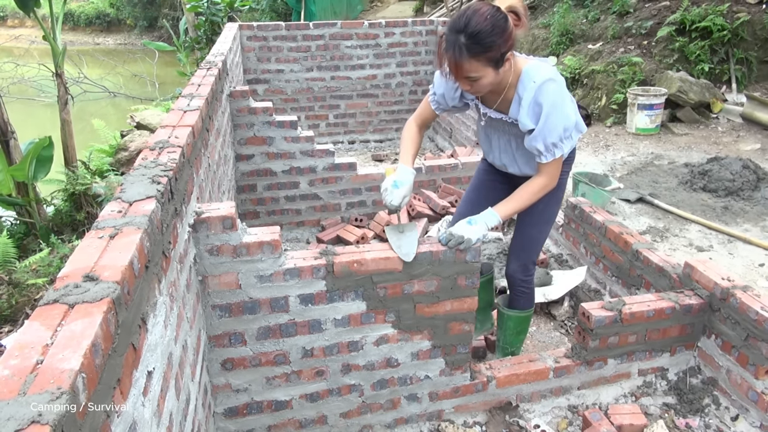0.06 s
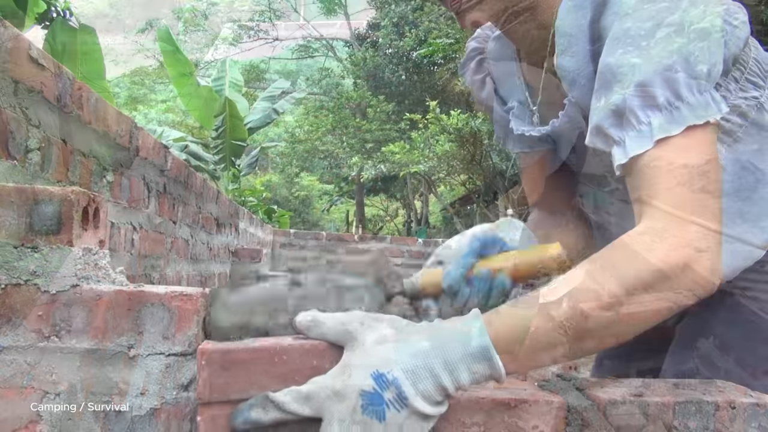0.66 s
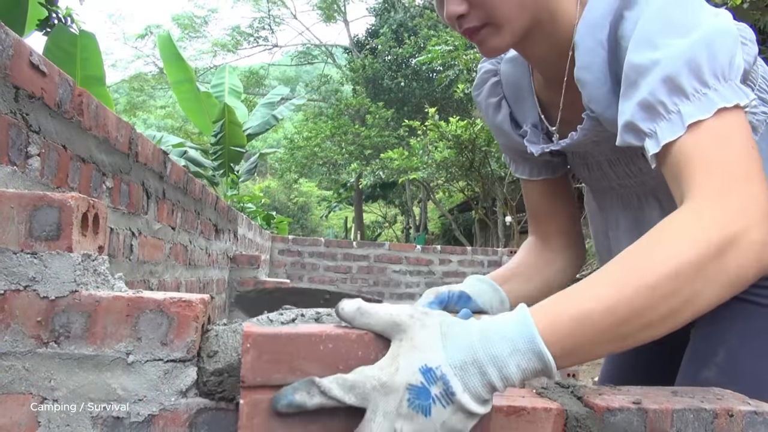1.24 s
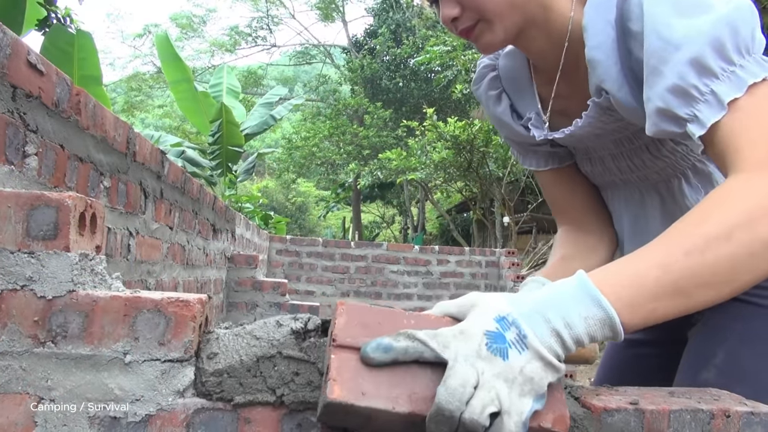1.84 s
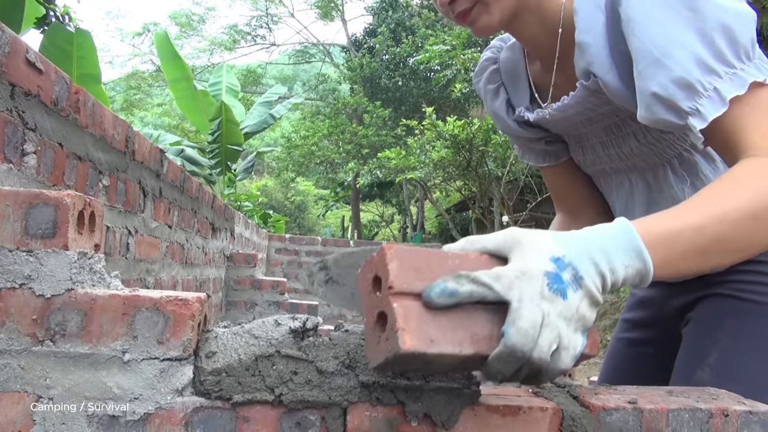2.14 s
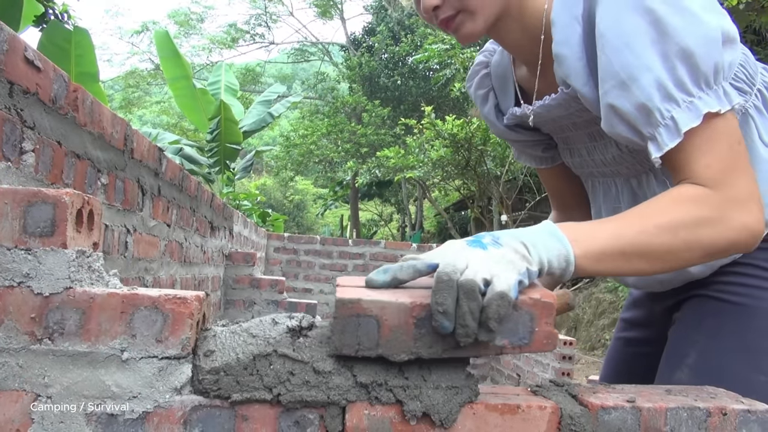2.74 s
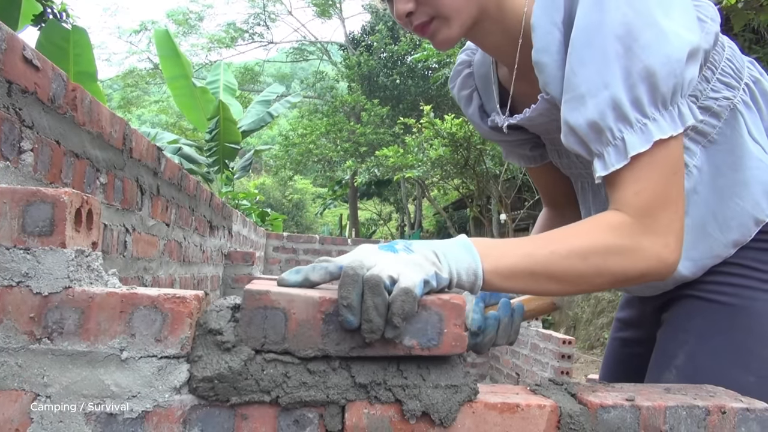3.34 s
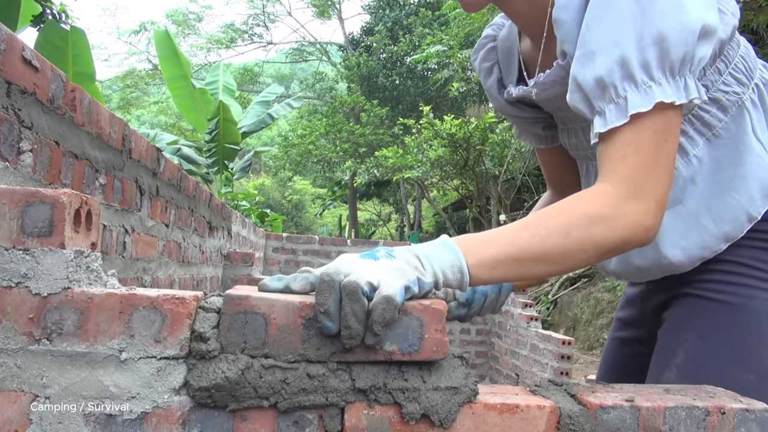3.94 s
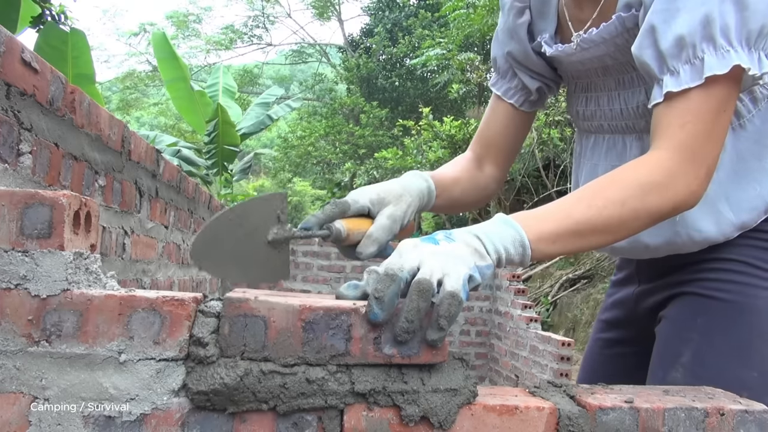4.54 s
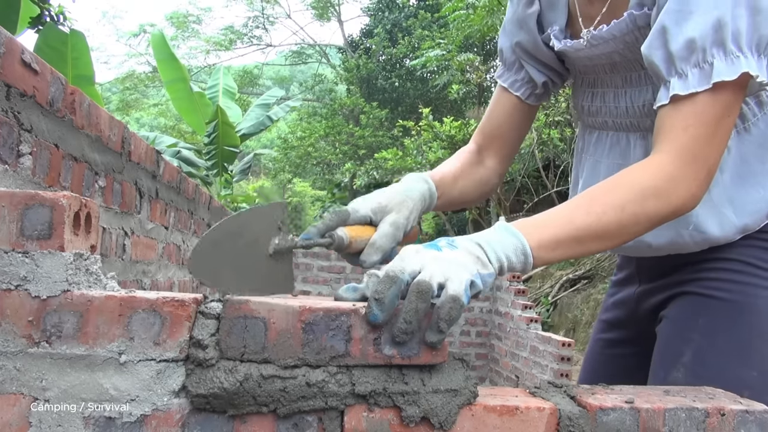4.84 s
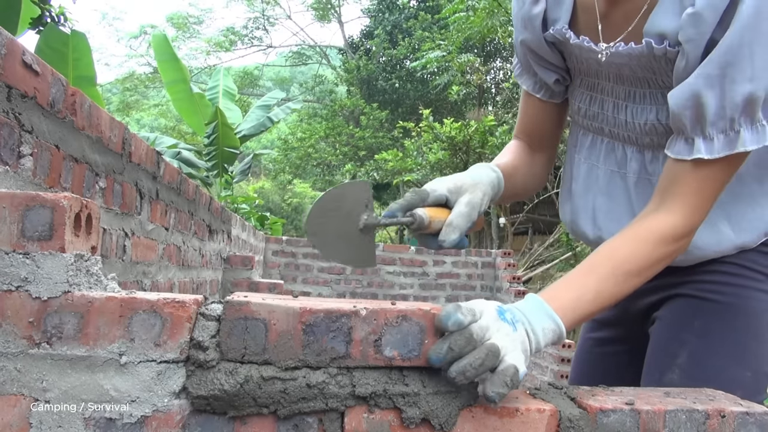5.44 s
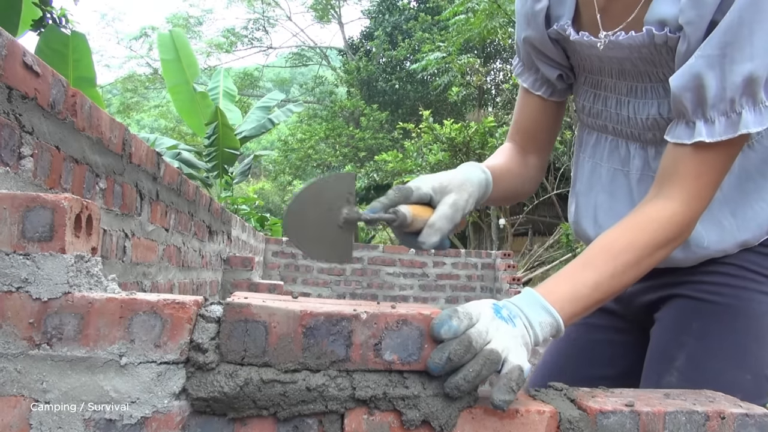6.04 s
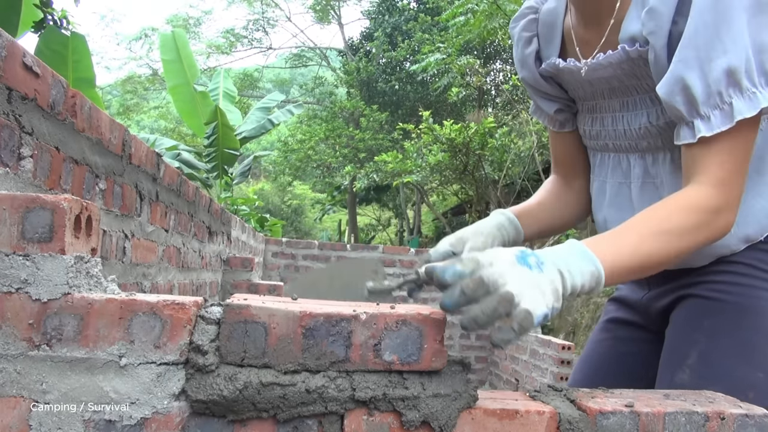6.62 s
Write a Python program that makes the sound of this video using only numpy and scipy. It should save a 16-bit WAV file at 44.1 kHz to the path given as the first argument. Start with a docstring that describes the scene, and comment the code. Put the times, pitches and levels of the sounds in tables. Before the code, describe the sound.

Close to a bricklayer outdoors, gritty trowel scrapes mix with light taps, glove rubs and the soft thumps of a brick. A quieter stretch follows, with wet mortar hissing and crackling under pressure. In the second half the steel trowel strikes the brick six times, in two uneven groups of three, cracking, thudding and ringing briefly. Gentle air, a thin insect drone and occasional far bird chirps sit behind.

```python
"""Outdoors between low brick walls, close to a bricklayer at work.
A steel trowel scrapes over sand and its blade sings; a brick bumps into its bed, squeezing out
crackling mortar. Two light taps come early, six hard ones later knock the brick level: each
cracks, clacks, thuds in the wall and rings the blade. Soft air, insects and a few far birds behind."""
import sys
import numpy as np
from scipy import signal
from scipy.fft import rfft, irfft
from scipy.io import wavfile
from scipy.ndimage import map_coordinates

SR = 44100
rng = np.random.default_rng(int(sys.argv[2]) if len(sys.argv) > 2 else 0)


def unload_audio(sound):
    """Save the sound as a 16-bit wav file, at the path given as the first command line argument."""
    columns = np.transpose(np.atleast_2d(sound))
    # keep every value between -1 and 1, then stretch to whole-number steps
    steps = np.round(np.clip(columns, -1, 1) * 32767)
    wavfile.write(sys.argv[1], SR, steps.astype(np.int16))


N = 294588
TIME_S = np.arange(N) / SR


def from_db(db):
    return 10 ** (np.asarray(db) / 20)


def unit_rms(x):
    return x / np.sqrt(np.mean(x ** 2) + 1e-20)


def at_hz(table, hz):
    """Interpolate on a log-frequency axis."""
    table_hz, values = np.transpose(table)
    return np.interp(np.log(np.maximum(hz, 1)), np.log(table_hz), values)


def add(out, start_s, sound):
    start = round(start_s * SR)
    out[..., start:start + sound.shape[-1]] += sound[..., :N - start]


def coloured(x, spectrum):
    """Apply a spectrum; rms 1."""
    n = x.shape[-1]
    gain = from_db(at_hz(spectrum, np.fft.rfftfreq(n, 1 / SR)))
    return unit_rms(irfft(rfft(x) * gain, n))


def band(x, low_hz, high_hz):
    return signal.sosfilt(signal.butter(2, [low_hz, high_hz], "band", fs=SR, output="sos"), x)


def resonator(x, hz, t60_s):
    """One mode; a unit click rings a sine of height 1."""
    r, w = from_db(-60 / (t60_s * SR)), 2 * np.pi * hz / SR
    return signal.lfilter([0, np.sin(w)], [1, -2 * r * np.cos(w), r * r], x + 1e-18)


def swell(peak_s, rise_s, fall_s):
    """Pressure grows and decays exponentially about a peak."""
    distance = np.maximum((peak_s - TIME_S) / rise_s, (TIME_S - peak_s) / fall_s)
    return np.exp(-np.minimum(distance, 20))


def push(start_s, length_s, attack_share=0.13, release_s=0.032):
    """Pressure ramps up, holds and dies away."""
    attack = np.clip((TIME_S - start_s) / (attack_share * length_s), 0, 1)
    return attack * np.exp(-np.clip((TIME_S - start_s - length_s) / release_s, 0, 20))


def grit(n, grains_per_s, spread_db, rub_db):
    """Two streams of uneven sand grains cracking over a smooth rub."""
    hits = rng.random((2, n)) < grains_per_s / SR
    sizes_db = spread_db * np.minimum(rng.exponential(1, hits.sum()), 4)
    grains = np.zeros((2, n))
    grains[hits] = from_db(sizes_db) * rng.choice([-1, 1], hits.sum())
    return unit_rms(grains) + from_db(rub_db) * rng.standard_normal((2, n))


def shifting_contact(x, depth_db, changes_per_s):
    """The contact patch keeps changing: each fifth of an octave comes and goes by itself."""
    hz, frame_s, frames = signal.stft(x, SR, nperseg=512)
    octaves = np.log2(np.maximum(hz, 500) / 500)
    grid = np.meshgrid(5 * octaves, frame_s * changes_per_s, indexing="ij")
    wander = map_coordinates(rng.standard_normal((30, 400)), grid, order=1, mode="mirror")
    _, varied = signal.istft(frames * from_db(depth_db * wander), SR)
    return unit_rms(varied[:, :N])


# Sound arriving from the sides: f/Hz, relative side gain/dB
SIDE_SPECTRUM = [(60, -13), (170, -24), (300, -16), (520, -12.5), (850, -0.5), (1400, -14), (2300, -34),
                 (4500, -14), (9000, -3.5), (15000, -21)]

def stereo(pair, side_db):
    """Left and right from a mid and a side signal."""
    mid, side = pair
    gain = from_db(side_db + at_hz(SIDE_SPECTRUM, np.fft.rfftfreq(len(mid), 1 / SR)))
    return mid + irfft(rfft(side) * gain, len(mid)) * [[1], [-1]]


# Air spectrum: f/Hz, relative level/dB
AIR_SPECTRUM = [(15, -49), (25, -50), (53, -7), (92, -7), (120, -8.5), (256, -4.5), (309, -7), (384, -3.5),
                (489, -5.5), (775, -5.5), (863, -6), (2550, -15.5), (3250, -16.5), (3720, -14),
                (16000, -26.5)]
# Left-right likeness of the air: f/Hz, coherence/1
AIR_COHERENCE = [(30, 0.43), (120, 0.42), (300, 0.49), (600, 0.03), (1500, 0.86), (4000, 1), (14000, .7)]
# Level of the air over time: t/s, gain/dB; a little louder for the first 0.7 s, then slowly sinking
AIR_LEVEL = [(.45, 2), (.7, 2), (4.5, 0.5), (5.3, -1.25)]

def open_air(level_db=-53.5):
    """Soft, wide noise, slowly sinking in level."""
    mid, side = rfft(rng.standard_normal((2, N)))
    coherence = at_hz(AIR_COHERENCE, np.fft.rfftfreq(N, 1 / SR))
    noise = irfft(np.sqrt(1 + coherence) * mid + np.sqrt(1 - coherence) * side * [[1], [-1]], N)
    drift_db = np.interp(TIME_S, *np.transpose(AIR_LEVEL))
    return from_db(level_db + drift_db) * coloured(noise, AIR_SPECTRUM)


def insects(centre_hz=4950, half_width_hz=170, level_db=-68):
    """A thin, steady chorus merged into one narrow band."""
    chorus = band(rng.standard_normal((2, N)), centre_hz - half_width_hz, centre_hz + half_width_hz)
    return from_db(level_db) * unit_rms(chorus)


# Glove rubs and mortar slumps: t/s, length/s, level/dB, centre f/Hz
RUBS = [(0.184, .17, -48, 292), (.37, 0.045, -41.5, 296), (0.544, .012, -40.5, 444), (0.711, .11, -34, 194),
        (1.184, 0.081, -40, 203), (1.291, 0.11, -44, 260), (1.395, 0.075, -43, 135),
        (1.548, 0.26, -53.5, 150), (2.058, 0.047, -46, 138), (6.475, 0.05, -44.5, 140),
        (6.524, 0.062, -36, 278)]

def soft_rubs(edge_ratio=1.56, scuff_db=-16):
    """Rubbing and falling crumbs shake low, heavily damped modes, with a little scuff above."""
    out = np.zeros((2, N))
    shake = grit(N, grains_per_s=300, spread_db=2.0, rub_db=-5.5)
    scuff = from_db(scuff_db) * unit_rms(band(rng.standard_normal((2, N)), 420, 1020))
    for start_s, length_s, db, hz in RUBS:
        near = slice(max(int((start_s - .2) * SR), 0), int((start_s + .7) * SR))
        body = unit_rms(band(shake[:, near], hz / edge_ratio, hz * edge_ratio))
        out[:, near] += from_db(db) * (body + scuff[:, near]) * push(start_s, length_s)[near]
    return stereo(out, side_db=1.0)


# Edge catches on sand and skids to rest: peak t/s, relative level/dB, fall/s
EDGE_CATCHES = [(.2, -33.5, 0.05), (0.2532, -30, 0.019), (.290, -32, 0.014), (0.8023, -20, 0.014),
                (1.01, -25, 0.0038), (1.4886, -20, 0.0035), (1.566, -35.5, .016), (2.059, -33.5, .012),
                (2.501, -45, .004), (3.718, -39.5, 0.0036), (3.733, -37.5, .006), (5.09, -46, 0.0087)]
# Blade drawn over brick: peak t/s, relative level/dB, rise/s
BLADE_STROKES = [(.32, -40, 0.056), (0.78, -32, 0.021), (1.0, -27, 0.0054), (1.68, -42.5, 0.058),
                 (2.087, -18, 0.011), (3.23, -48, .015), (3.305, -50, .009), (4.207, -37, 0.012),
                 (4.358, -47, 0.0064), (5.05, -40.5, .04), (6.61, -54, 0.21)]
# Rasp of steel on sand: f/Hz, relative level/dB
RASP_SPECTRUM = [(350, -26), (600, -9), (950, -20.5), (1250, -2), (1750, 1), (2000, -2), (2540, 2.5),
                 (4000, 0.5), (6000, -2.5), (8500, -3.5), (11500, -9), (14000, -16), (16000, -45)]
# Trowel blade modes, also rung by the taps: f/Hz, relative level/dB, t60/s
BLADE_MODES = [(1308, -2, .27), (1355, -5, .18), (1408, 0, .14), (1982, -2, .17), (2056, -3, .24),
               (2270, -4, .13), (2351, -2, .16), (2490, -5, .19), (2992, 0, .17), (4100, -3.5, .13),
               (5012, -12, .13), (5400, -13, .2), (5640, -9, .18), (5990, -8, .15), (6290, -14, .16),
               (6720, -10, .15)]

def trowel_scrapes(rasp_db=1.0, blade_db=-51, catch_rise_s=0.00051):
    """Sand grains break under each stroke and stir the blade's modes."""
    force = sum(from_db(db) * swell(s, catch_rise_s, fall_s) for s, db, fall_s in EDGE_CATCHES)
    force += sum(from_db(db) * swell(s, rise_s, 0.98 * rise_s) for s, db, rise_s in BLADE_STROKES)
    grains = grit(N, grains_per_s=2500, spread_db=2.5, rub_db=-4.5)
    grains = shifting_contact(grains, depth_db=4.5, changes_per_s=18)
    rasp = force * stereo(coloured(grains, RASP_SPECTRUM), side_db=-4.0)
    blade = sum(from_db(db) * resonator(rasp[0], hz, t60_s) for hz, db, t60_s in BLADE_MODES)
    return from_db(rasp_db) * rasp + from_db(blade_db) * blade


# Blade tones as the edge drags free: peak t/s, level/dB, f/Hz, rise/s
BLADE_TONES = [(.204, -32, 1615, 0.0048), (.33, -42.5, 1410, 0.053), (.35, -49, 2010, 0.027),
               (.36, -47, 5400, 0.063), (0.751, -26, 2503, 0.014), (1.018, -33, 2020, .008),
               (1.08, -36, 2488, 0.016), (2.09, -28.5, 1730, 0.0095)]

def blade_singing(t60_s=0.091):
    """Friction keeps single modes of the free blade sounding."""
    out = np.zeros(N)
    for peak_s, db, hz, rise_s in BLADE_TONES:
        tone = unit_rms(resonator(rng.standard_normal(N), hz, t60_s))
        out += from_db(db) * swell(peak_s, rise_s, 0.98 * rise_s) * tone
    return out


# Brick and trowel on the soft bed: t/s, level/dB, f/Hz, t60/s
BED_KNOCKS = [(0.5435, -18.5, 387, .034), (.803, -19.5, 272, 0.091), (.82, -28, 131, 0.14),
              (1.008, -26.5, 300, 0.056), (1.243, -27.5, 647, 0.035), (1.389, -25, 171, 0.13),
              (1.493, -24.5, 246, 0.062), (1.94, -38.5, 558, 0.079), (6.55, -35, 110, 0.13),
              (6.595, -35.5, 120, .08)]

def bed_knocks(contact_s=0.0011):
    """A cushioned contact swings one low mode for a few cycles."""
    out, t = np.zeros(N), np.arange(SR // 4) / SR
    onset = 1 - np.exp(-t / contact_s)
    for start_s, db, hz, t60_s in BED_KNOCKS:
        add(out, start_s, onset * from_db(db - 60 * t / t60_s) * np.sin(2 * np.pi * hz * t))
    return out


# Pushes on the mortar: t/s, length/s, midway level/dB, growth/dB, fine hiss gain/dB
MORTAR_PUSHES = [(0.551, 0.34, -49, 3.5, -2), (0.922, .25, -43.5, -3, 0), (1.205, 0.34, -47, 2, 1.5),
                 (1.544, 0.52, -46, -5.5, -3.5), (2.211, 0.092, -51, 2.5, -11), (2.63, 0.97, -46, 4.5, -2),
                 (3.741, 0.04, -47, -1, -2), (3.888, .06, -57.5, -1, 2), (4.106, .11, -44, 3, 2),
                 (4.278, .095, -46.5, 2.5, -3)]
# Wet sand: f/Hz, relative level/dB
MORTAR_SPECTRUM = [(400, -13.5), (600, -16.5), (850, -16.5), (1300, -1), (1600, -3.5), (2400, 1),
                   (4000, -1.5), (6000, -3.5), (9000, -6.5), (12000, -11), (16000, -24)]

def mortar(hiss_above_hz=5500):
    """Wet sand crackles and hisses as it is spread or squeezed under the brick."""
    grains = grit(N, grains_per_s=1000, spread_db=3.5, rub_db=2.0)
    grains = shifting_contact(grains, depth_db=2.5, changes_per_s=12)
    sand = stereo(coloured(grains, MORTAR_SPECTRUM), side_db=-2.5)
    coarse = signal.sosfiltfilt(signal.butter(2, hiss_above_hz, fs=SR, output="sos"), sand)
    hiss = sand - coarse
    out = np.zeros((2, N))
    for start_s, length_s, db, growth_db, hiss_db in MORTAR_PUSHES:
        progress = np.clip((TIME_S - start_s) / length_s, 0, 1)
        pressure = from_db(db + growth_db * (progress - .5)) * push(start_s, length_s)
        out += pressure * (coarse + from_db(hiss_db) * hiss)
    return out


# Sand crushed by the edge: f/Hz, relative level/dB
CRACK_SPECTRUM = [(300, -12), (1200, 8.5), (3000, 6.5), (6000, 2), (9000, 3), (12000, -5), (16000, -24)]

def edge_crack(t, crush_s=0.0066, snap_s=0.0001, snap_db=12.5):
    """Steel meets fired clay: one pressure snap and a moment of crushed sand."""
    sand = stereo(coloured(rng.standard_normal((2, len(t))), CRACK_SPECTRUM), side_db=-6)
    snap = band(np.exp(-t / snap_s), 270, 7500)
    return sand * np.exp(-t / crush_s) - from_db(snap_db) * snap


# Crowded modes of brick and wall: f/Hz, relative level/dB
CLACK_SPECTRUM = [(300, -12.5), (800, -15), (1200, 4), (1700, -3), (2400, 2.5), (3300, -4.5), (4600, -16),
                  (6000, -9.5), (7500, -13), (9000, -21), (12000, -31), (16000, -39)]
# Their decay: f/Hz, t60/s
CLACK_DECAY = [(300, 0.21), (1200, 0.12), (2500, 0.11), (5000, 0.097), (12000, 0.14)]

def brick_clack(t, hold_s=0.015, tail_db=-25.5, tail_s=0.075):
    """Gritty modes, fed briefly by near reflections, die fast into a faint tail from the yard."""
    grains = grit(len(t), grains_per_s=2500, spread_db=3.0, rub_db=-1.5)
    noise = stereo(coloured(grains, CLACK_SPECTRUM), side_db=2.0)
    out = from_db(tail_db) * noise * np.exp(-t / tail_s)
    edges_hz = np.geomspace(250, 16000, 7)
    for low_hz, high_hz in zip(edges_hz, edges_hz[1:]):
        t60_s = at_hz(CLACK_DECAY, np.sqrt(low_hz * high_hz))
        out += band(noise, low_hz, high_hz) * from_db(-60 * np.maximum(t - hold_s, 0) / t60_s)
    return out


# Wall modes: f/Hz, relative level/dB, t60/s
WALL_MODES = [(76, -23, .25), (132, -7, .17), (190, -5, .08), (246, 0, .08), (295, -5, .13), (376, -2, .11),
              (450, -10, .11), (500, -9, .11), (578, -4, .13), (652, -10, .1), (712, -10, .1)]

def wall_thud(t):
    """Each blow shakes the wall's low modes a little differently."""
    modes = [from_db(db - 60 * t / t60_s) * np.sin(2 * np.pi * hz * t) for hz, db, t60_s in WALL_MODES]
    strengths = rng.choice([-1, 1], len(modes)) * from_db(rng.normal(0, 1.0, len(modes)))
    pressure = band(strengths @ np.array(modes), 101, 960)
    sideways = signal.hilbert(pressure).imag  # standing wave: air motion is a quarter cycle off
    fade = np.minimum(2 - 4 * t, 1)
    return stereo((pressure, sideways), side_db=2.5) * fade


def blade_ring(t, first_hz, second_hz, clack_db, spot_octaves=0.093, second_db=-4):
    """A light touch rings the modes that the striking spot favours; a hard blow wakes them all."""
    out, floor = 0, from_db(-5 + 0.41 * clack_db)
    for hz, db, t60_s in BLADE_MODES:
        octaves_off = np.log2(hz / np.array([first_hz, second_hz]))
        first, second = np.exp(-(octaves_off / spot_octaves) ** 2)
        drive = max(first, from_db(second_db) * second, floor)
        scatter_db = rng.normal(0, hz / 3500)  # high modes depend most on the exact spot
        ear_db = db + scatter_db + rng.normal(0, 1.6, (2, 1))
        gripped_hz = hz * (1 + .002 * rng.standard_normal())  # the hand detunes the blade
        ear_phase_rad = rng.normal(0, 0.15, (2, 1))
        tone = np.sin(2 * np.pi * gripped_hz * t + ear_phase_rad) * rng.choice([-1, 1])
        out += drive * from_db(ear_db - 60 * t / t60_s) * tone
    return out


def blade_overtones(t, count=36, t60_at_5khz_s=0.15, tilt_db_per_octave=-3.0):
    """Short high modes, new with each blow; the highest are weakest and die first."""
    hz = np.exp(rng.uniform(np.log(3500), np.log(13000), size=(count, 1)))
    octaves = np.log2(hz / 5000)
    t60_s = t60_at_5khz_s / np.sqrt(2) ** octaves
    modes = np.sin(2 * np.pi * hz * t) * from_db(tilt_db_per_octave * octaves - 60 * t / t60_s)
    ear_db = rng.normal(0, 4.5, count) + rng.normal(0, 4.3, (2, count))
    strengths = from_db(ear_db) * rng.choice([-1, 1], count)
    return unit_rms(strengths) @ modes


# Neighbouring walls: delay/s, gain/dB
WALL_REFLECTIONS = [(.0034, -11), (.0112, -15), (.0191, -16), (.0232, -19)]

def wall_echoes(x):
    """Short, duller slaps off the brickwork."""
    dull = band(x, 240, 5400)
    return sum(from_db(db) * np.interp(TIME_S - s, TIME_S, dull) for s, db in WALL_REFLECTIONS)


# Trowel on brick: t/s; relative level/dB of clack, crack, thud, knock, ring;
# first and second f/Hz favoured by the striking spot
TROWEL_TAPS = [(0.7107, -42, -42, -49, -54, -22.5, 2510, 5990),
               (.998, -29, -31, -47.5, -41, -19.5, 1315, 1410),
               (4.6092, -14, -20, -28, -38, -14.5, 2370, 1430),
               (4.7684, -18.5, -25.5, -26, -38, -21.5, 2300, 1430),
               (4.9691, -16, -21.5, -25.5, -37, -14, 1427, 2330),
               (5.7483, -14.5, -21.5, -29, -27.5, -15, 1420, 2992),
               (5.94, -16, -22, -24, -29.5, -16.5, 1320, 2992),
               (6.373, -17, -17, -29, -35, -15.5, 1990, 4100)]

def trowel_taps(brick_hz=925, brick_t60_s=0.18):
    """Each blow cracks, clacks and knocks the brick, thuds in the wall and rings the blade."""
    t = np.arange(SR // 2) / SR
    bodies, cracks = np.zeros((2, N)), np.zeros((2, N))
    hollow_knock = np.sin(2 * np.pi * brick_hz * t) * from_db(-60 * t / brick_t60_s)
    for start_s, clack_db, crack_db, thud_db, knock_db, ring_db, first_hz, second_hz in TROWEL_TAPS:
        add(cracks, start_s, from_db(crack_db + 6.5) * edge_crack(t))
        add(bodies, start_s, from_db(clack_db + 1.0) * brick_clack(t))
        add(bodies, start_s, from_db(thud_db + 3.0) * wall_thud(t))
        add(bodies, start_s, from_db(knock_db) * hollow_knock)
        add(bodies, start_s, from_db(ring_db) * blade_ring(t, first_hz, second_hz, clack_db))
        add(bodies, start_s, from_db(crack_db - 15.5) * blade_overtones(t[:len(t) // 2]))
    return bodies + cracks + wall_echoes(cracks[0])


# Bird notes: t/s, length/s, start f/Hz, end f/Hz, level/dB
BIRD_NOTES = [(1.514, 0.093, 3820, 2750, -43), (2.53, 0.09, 2950, 3200, -55.5),
              (5.252, 0.067, 2800, 3350, -56.5), (5.305, 0.059, 3120, 2890, -58),
              (5.6, 0.1, 3270, 3230, -57.5)]

def birds(waver_share=0.038):
    """Far whistled glides, blurred by the trees."""
    out = np.zeros(N)
    for start_s, length_s, start_hz, end_hz, db in BIRD_NOTES:
        n = int(length_s * SR)
        waver = waver_share * unit_rms(band(rng.standard_normal(n), 40, 400))
        hz = np.linspace(start_hz, end_hz, n) * (1 + waver)
        whistle = np.sin(2 * np.pi * np.cumsum(hz) / SR)
        add(out, start_s, from_db(db) * np.sqrt(2 * np.hanning(n)) * whistle)
    return out


def scene(pan_db=0.3):
    """The work sits just left of centre, amid birds, air and insects."""
    work = trowel_taps() + trowel_scrapes() + blade_singing() + mortar() + bed_knocks() + soft_rubs()
    return work * from_db([[pan_db], [-pan_db]]) + birds() + open_air() + insects()


def record(dry, ceiling=0.67, cutoff_hz=15900):
    """Soft clip, then steep low-pass."""
    rounded = ceiling * np.tanh(dry / ceiling)
    return signal.sosfilt(signal.ellip(10, .1, 80, cutoff_hz, fs=SR, output="sos"), rounded)


dry = scene()
out = record(dry)
unload_audio(out)
```